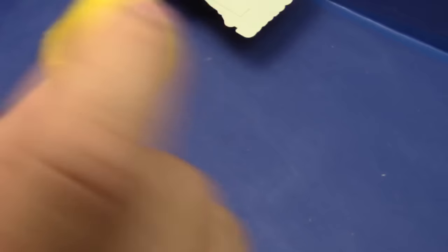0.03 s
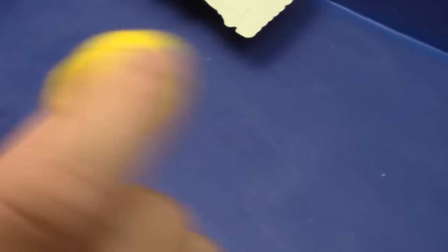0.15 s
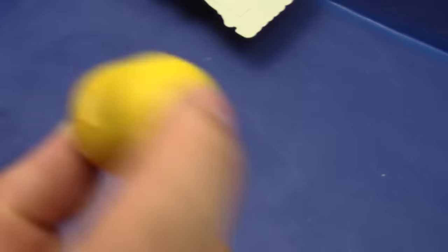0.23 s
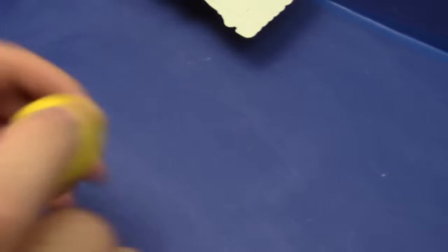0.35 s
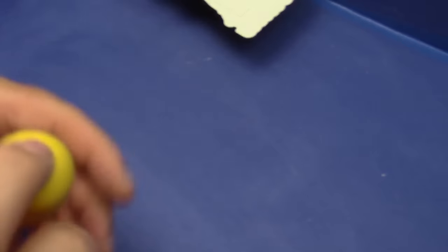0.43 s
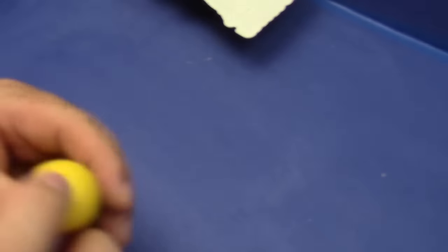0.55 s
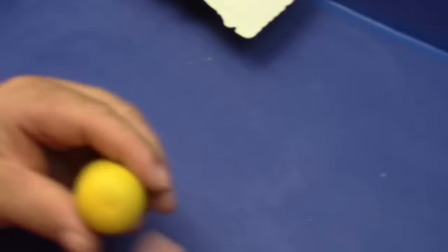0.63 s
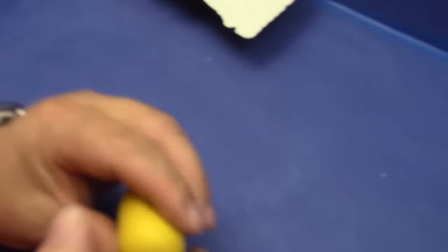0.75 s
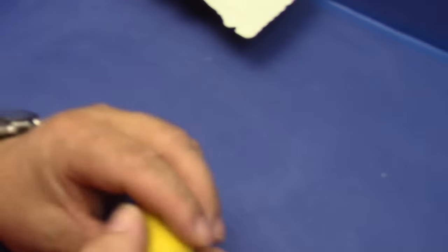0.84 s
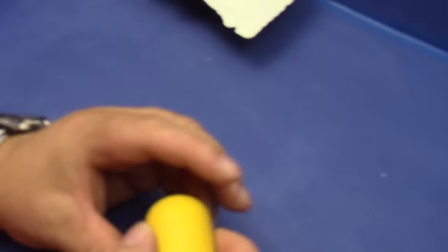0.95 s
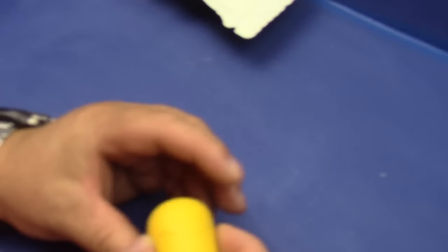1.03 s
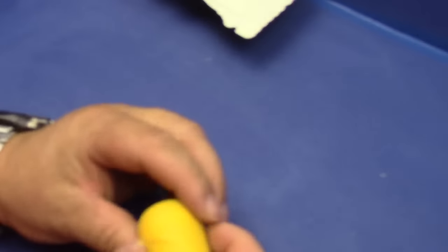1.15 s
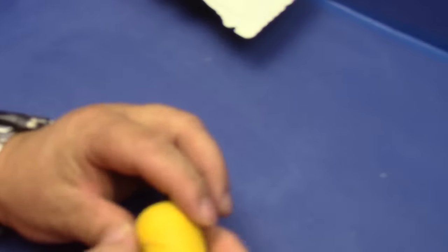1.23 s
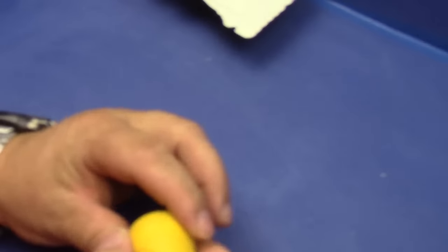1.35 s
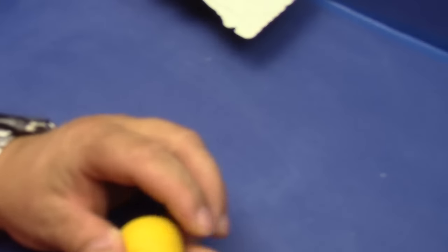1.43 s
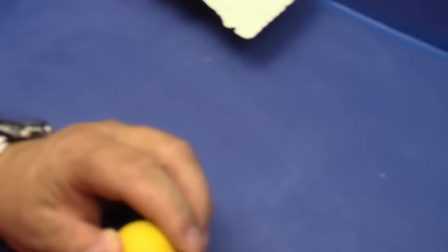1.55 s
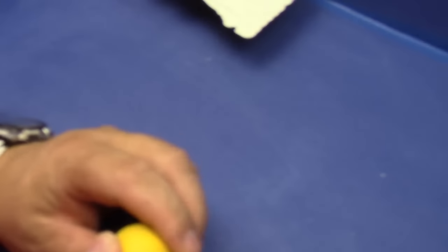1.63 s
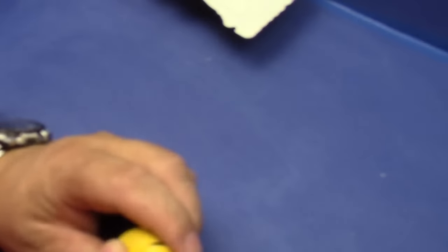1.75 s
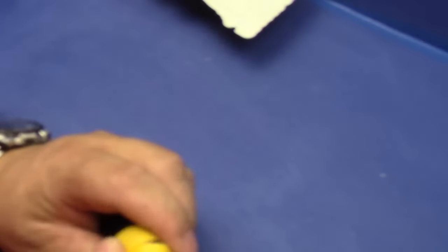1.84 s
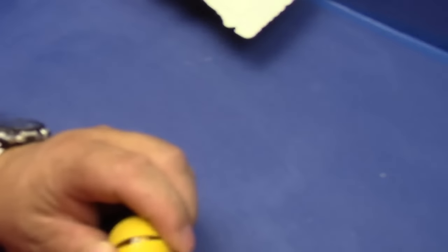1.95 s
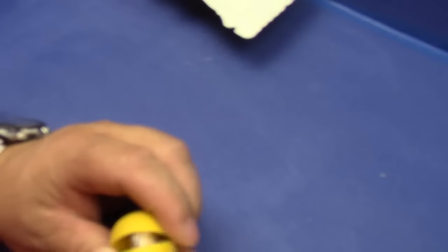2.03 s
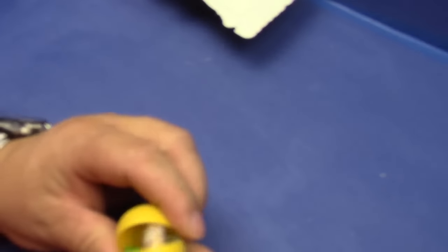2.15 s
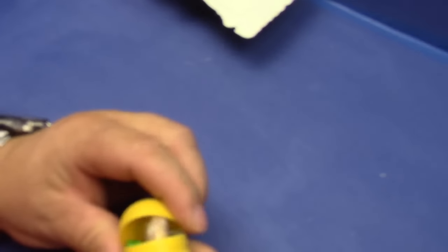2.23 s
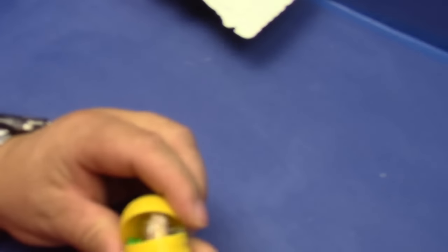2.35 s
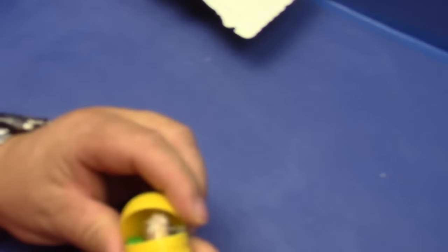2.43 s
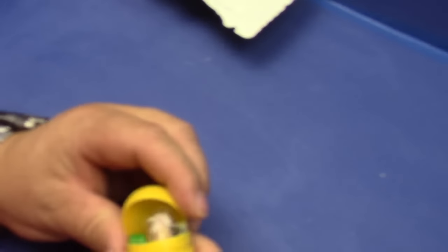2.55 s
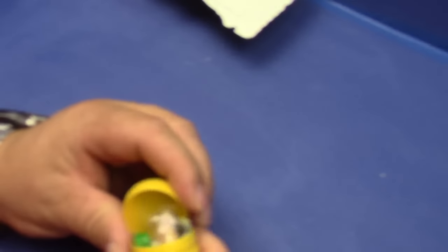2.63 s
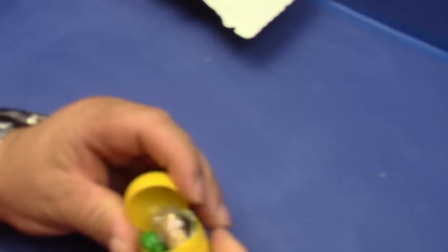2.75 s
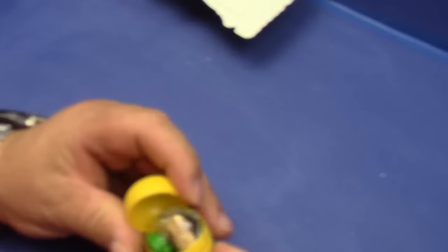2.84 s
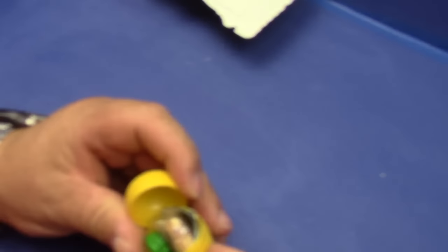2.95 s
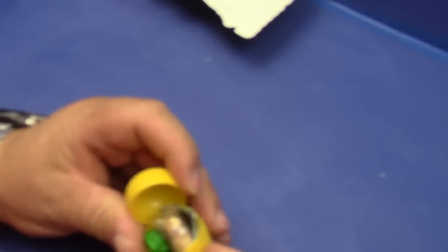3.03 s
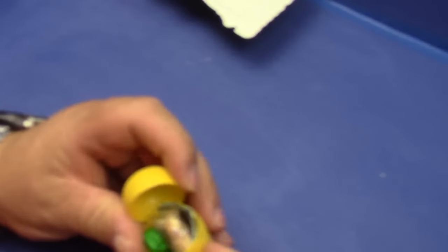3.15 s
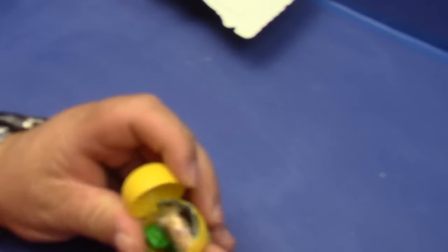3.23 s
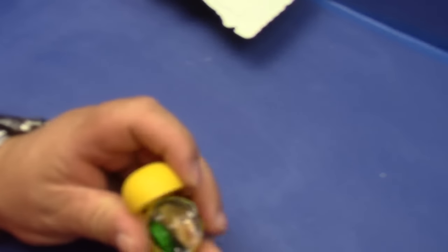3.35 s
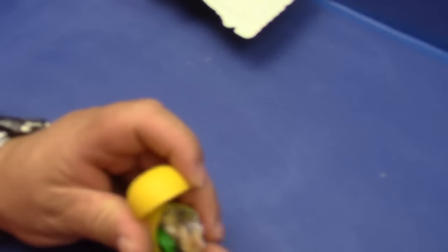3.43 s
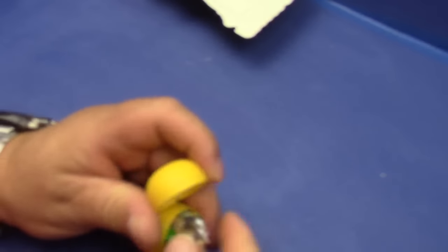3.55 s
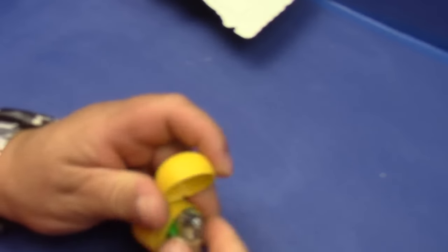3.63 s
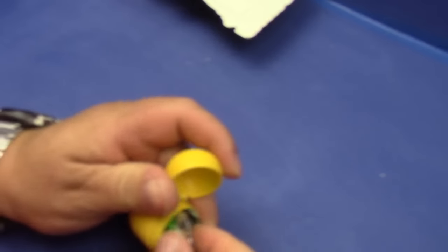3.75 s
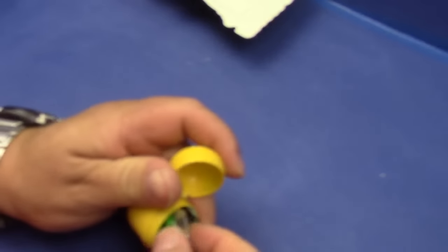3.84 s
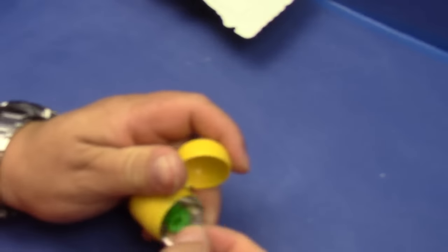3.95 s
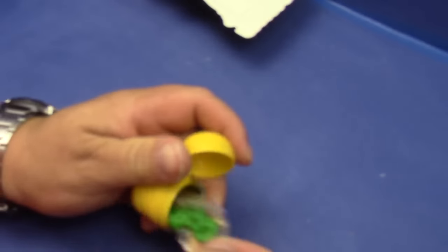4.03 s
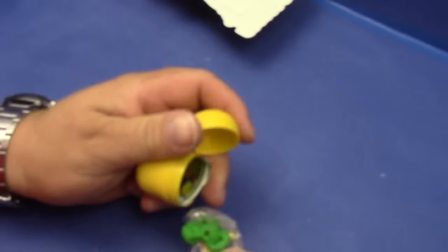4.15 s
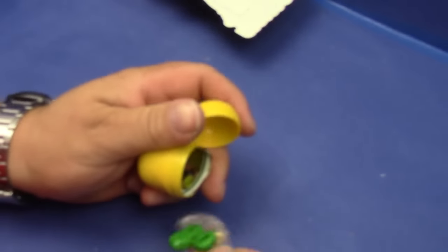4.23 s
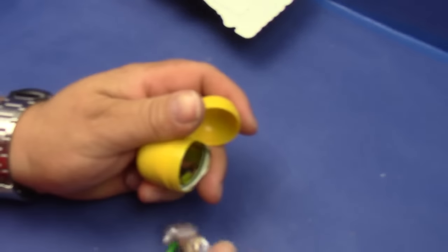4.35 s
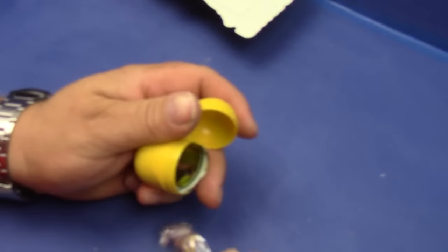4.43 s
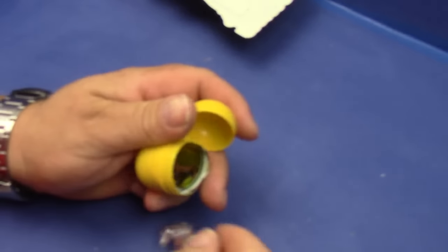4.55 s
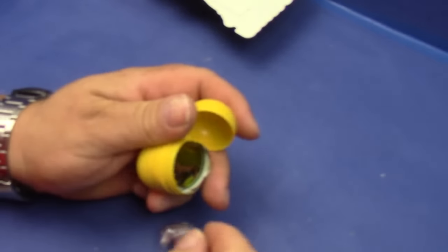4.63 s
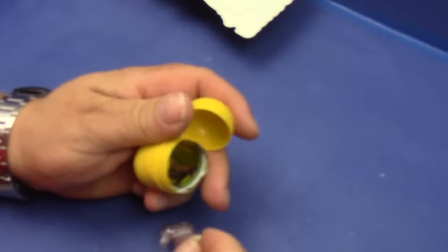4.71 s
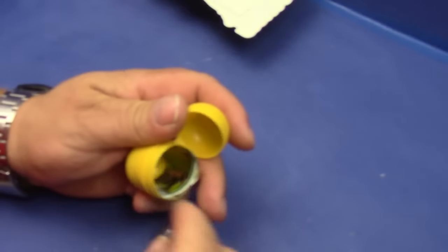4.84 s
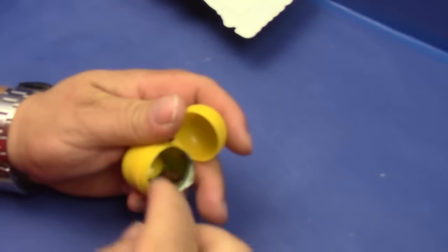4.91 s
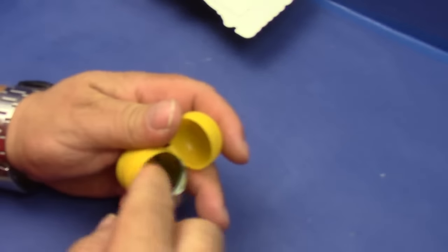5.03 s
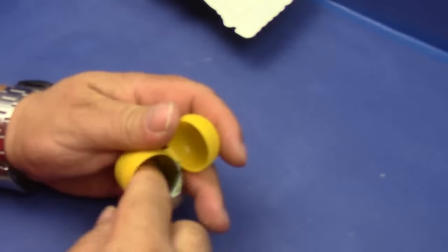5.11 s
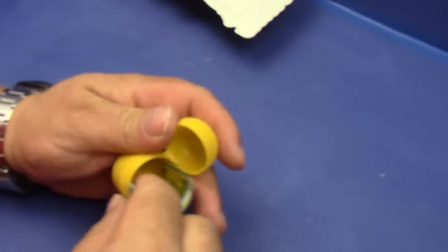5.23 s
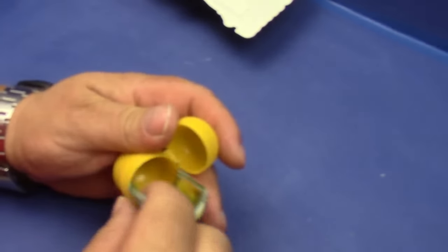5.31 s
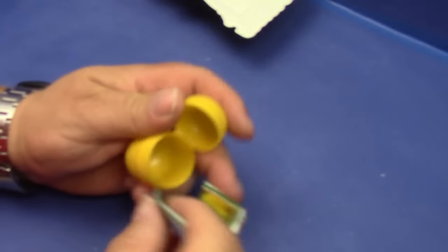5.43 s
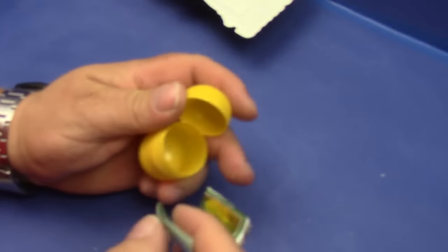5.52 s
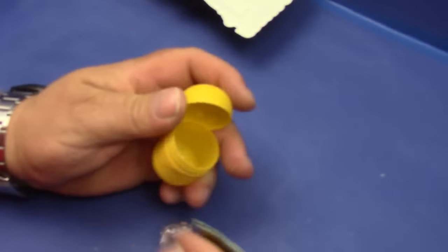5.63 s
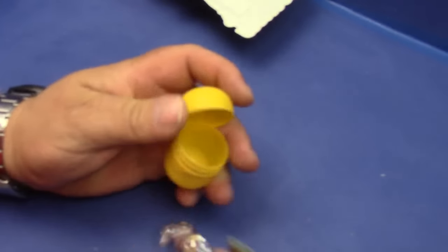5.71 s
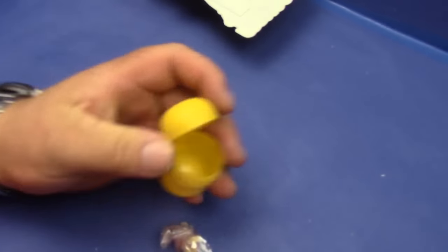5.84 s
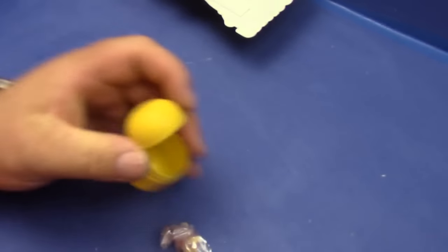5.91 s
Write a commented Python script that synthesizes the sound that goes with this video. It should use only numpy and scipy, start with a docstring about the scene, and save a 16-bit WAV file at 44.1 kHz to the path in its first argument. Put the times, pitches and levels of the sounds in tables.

```python
"""Hands squeeze a small plastic capsule open over a table, then pull out a crinkly bag and a rolled leaflet.
Shell and film crack: short noise snaps ring the film high up and the hollow cup lower down.
Dull knocks are soft taps that ring the struck part and shake the table top and the capsule's hollow.
Skin, film and paper rub, and parts rattle after the pop: hiss and tiny slips through film, cup and table.
A quiet room adds echoes made of fading noise, and a steady air noise lies below."""
import sys
import numpy as np
from scipy import signal
from scipy.fft import rfft, irfft
from scipy.io import wavfile

SR = 44100
rng = np.random.default_rng(int(sys.argv[2]) if len(sys.argv) > 2 else 0)


def wav_out(sig):
    """Save sig, one row per channel (or a flat mono array), as 16-bit PCM at SR to the path in sys.argv[1]."""
    wavfile.write(sys.argv[1], SR, np.round(np.clip(np.atleast_2d(sig).T, -1, 1) * 32767).astype(np.int16))


N = 263762   # length in samples


def amp(db):
    """Turn decibels into a gain."""
    return 10 ** (np.asarray(db) / 20)


def rms_one(x):
    """Scale a signal to an rms level of 1."""
    return x / np.sqrt(np.mean(x ** 2) + 1e-20)


def at_hz(points, hz):
    """Read a table between its points, along a log-frequency axis."""
    p = np.array(points)
    return np.interp(np.log(np.maximum(hz, 1)), np.log(p[:, 0]), p[:, 1])


def resonance(x, hz, width_hz):
    """Ring at one pitch: a two-pole band-pass with a gain of about 1 at its peak."""
    r = np.exp(-np.pi * width_hz / SR)
    top = [(1 - r * r) / 2, 0, (r * r - 1) / 2]
    bottom = [1, -2 * r * np.cos(2 * np.pi * hz / SR), r * r]
    return signal.lfilter(top, bottom, x)


def body(x, peaks):
    """Ring an object: several resonances side by side, with alternating signs."""
    return sum((-1) ** k * amp(db) * resonance(x, hz, width)
               for k, (hz, width, db) in enumerate(peaks))


def highpass(x, order, hz):
    """Remove what lies below a frequency."""
    return signal.sosfilt(signal.butter(order, hz, "high", fs=SR, output="sos"), x)


def band(x, low_hz, high_hz):
    """Keep what lies between two frequencies."""
    return signal.sosfilt(signal.butter(2, [low_hz, high_hz], "band", fs=SR, output="sos"), x)


def flicker(rate_hz):
    """Slow random wandering with an rms of 1."""
    r = np.exp(-2 * np.pi * rate_hz / SR)
    settle = 9000   # samples dropped while the filter settles
    wander = signal.lfilter([1], [1, -2 * r, r * r], rng.standard_normal(N + settle))
    return rms_one(wander[settle:])


def burst(noise, click, t60, tail_t60, tail_db):
    """One sharp click, a snap of noise that dies within milliseconds, and a weaker, longer chatter."""
    t = np.arange(len(noise)) / SR
    snap = amp(-60 * t / t60)
    chatter = amp(tail_db - 60 * t / tail_t60)
    return click * (t == 0) + noise * (snap + chatter)


def add(out, piece, s, peak_db):
    """Lay a piece in at a time, with a given peak."""
    i = round(s * SR)
    scaled = amp(peak_db) * piece / np.abs(piece).max()
    out[i:i + len(piece)] += scaled[:N - i]


# Cracks of shell and film; pitch is the fold's own: start_s, treble_peak_db, cup_peak_db, pitch_hz
CRACKS = [(0.7794, -21, -21, 2140), (1.4332, -27.5, -34, 8700), (1.5946, -39, -57, 5860),
          (1.6663, -43, -34.5, 2320), (1.7873, -24, -9, 2450), (1.7884, -3, 1, 2404),
          (1.8025, -8, -20.5, 10400), (1.8063, -17, -14, 6330), (1.8261, -22.5, -24, 6520),
          (1.831, -16.5, -28.5, 11130), (1.8443, -18.5, -28, 8400), (1.9077, -9, -26, 6300),
          (1.9281, -14, -6.5, 2690), (1.9364, -19, -17, 11000), (1.9518, -14, -19.5, 5260),
          (1.995, -15.5, -16, 6240), (2.0146, -16.5, -22, 5440), (2.1542, -29.5, -22.5, 2780),
          (2.219, -30.5, -31, 3030), (3.102, -5.5, -11, 2880), (3.2006, -18, -12.5, 3220),
          (3.3466, -33, -30, 1680), (3.3668, -26, -16.5, 2070), (3.4518, -43, -35, 2120),
          (3.7045, -35, -35.5, 2730), (3.7428, -14.5, -23.5, 10800), (3.7515, -14.5, -24, 9800),
          (3.9031, -7.5, -30, 8750), (3.9142, -8, -13.5, 9100), (3.9375, -0.5, -16.5, 9000),
          (3.9709, 0, -17.5, 9000), (4.0242, -12.5, -18, 8500), (4.0543, -12, -7, 9500),
          (4.0571, 1, -8, 1500), (4.0674, -2.5, -45, 5830), (4.0966, -25, -18.5, 1980),
          (4.1981, -21, -24, 7400), (4.216, -4.5, -8.5, 9000), (4.2566, -13, -20.5, 9500),
          (4.2912, -0.5, -16, 9900), (4.2999, -11, -13, 9050), (4.3326, -7, -9.5, 3420),
          (4.3412, -7, -9.5, 6260), (4.3705, -26, -16, 1700), (4.3764, -19, -26, 6200),
          (4.4636, -38, -11, 2620), (4.5223, -11, -12, 1490), (4.5677, -29.5, -22.5, 3520),
          (4.8295, -28.5, -48, 8600), (5.3803, -22, -36, 6400), (5.7339, -10, -22, 5700),
          (5.803, -47, -21, 1400)]
# Resonances of the thin film: pitch_hz, width_hz, level_db
FILM_RINGS = [(4780, 2000, 0), (5965, 510, 8), (8040, 3300, 2.5), (10830, 630, -6), (11270, 1400, -30.5),
              (14900, 3900, -8)]
CUP_BELOW_HZ = 4500   # a fold pitched lower than this is heard through the cup
USUAL_TREBLE_HZ, USUAL_CUP_HZ = 6480, 2610   # where the other part of a crack rings
CHATTER_T60_S, CHATTER_DB = 0.032, -8   # fade time of the chatter, and its start beside the snap


def cracks():
    """Each buckling fold rings the film high up and the air in the cup lower down."""
    out = np.zeros(N)
    folds = list(CRACKS) + crackle()
    noise = rng.standard_normal((len(folds), 2, 2600))
    for (start, treble_db, cup_db, hz), (film_noise, cup_noise) in zip(folds, noise):
        through_cup = hz < CUP_BELOW_HZ
        cup_hz = hz if through_cup else USUAL_CUP_HZ
        treble_hz = USUAL_TREBLE_HZ if through_cup else hz

        snap = burst(film_noise, 6, .004, CHATTER_T60_S, CHATTER_DB)
        treble = .45 * body(snap, FILM_RINGS) + resonance(snap, treble_hz, 1500)
        add(out, band(treble, 3500, 16500), start, treble_db)

        pop = burst(cup_noise, 5, .005, CHATTER_T60_S, CHATTER_DB + 2)
        hollow = 0.67 * band(pop, 1300, 5500) + resonance(pop, cup_hz, 600)
        add(out, band(hollow, 980, 5000), start, cup_db)
    return out


# Spells of small random crackle; the peak is the middle one: start_s, end_s, cracks_per_s, treble_peak_db
CRACKLE_SPELLS = [(1.897, 1.967, 60, -24), (3.975, 4.11, 30, -37), (4.221, 4.44, 30, -25)]
CRACKLE_SPREAD_DB = 4   # peaks vary this far up or down
CRACKLE_CUP_DB = 0   # usual cup peak minus treble peak


def crackle():
    """Small folds give way at random moments, strengths and pitches; rows have the columns of CRACKS."""
    rows = []
    draws = rng.random((len(CRACKLE_SPELLS), 30, 4))
    for (start, end, per_s, db), spell in zip(CRACKLE_SPELLS, draws):
        count = int(per_s * (end - start))
        for when, size, lean, pitch in spell[:count]:
            moment = start + when * (end - start)
            peak = db + CRACKLE_SPREAD_DB * (2 * size - 1)
            cup_peak = peak + CRACKLE_CUP_DB + 8 * (lean - .5)
            rows.append((moment, peak, cup_peak, 5500 * 2 ** pitch))
    return rows


# Dull knocks of fingers and parts; the last column is the usual push on the low modes beside the peak:
# time_s, peak_db, pitch_hz, push_share_db
KNOCKS = [(0.51, -50, 543, 7), (0.778, -31, 855, -24), (0.917, -30, 374, -31), (0.918, -20, 1050, -25),
          (0.957, -28, 1140, -19), (1.787, -11, 640, 3), (1.801, 1.5, 600, -25), (1.813, -12.5, 480, -11.5),
          (2.218, -27.5, 1360, -18), (3.766, -34.5, 507, -8), (3.807, -32, 476, -8),
          (4.054, -12.5, 1420, -33), (4.33, -13.5, 1030, -4.5), (4.368, -20, 980, -6.5),
          (4.406, -12, 716, -10), (4.462, -11, 620, -32), (4.463, 1.5, 1295, -27), (4.473, -4.5, 1240, -36),
          (4.498, -6.5, 1130, -24), (4.521, -5, 1390, -40), (4.522, -8.5, 722, -31),
          (4.564, -16, 765, -8.5), (5.351, -29, 1260, -24), (5.8, -34.5, 305, -11),
          (5.803, -29.5, 766, -16), (5.829, -28.5, 710, -22)]
# Ringing modes of the table top, and near 636 Hz the capsule's hollow; t60 is the time to fade by 60 dB:
# pitch_hz, level_db, t60_s
LOW_MODES = [(208, -8.5, 0.32), (276.3, -15.5, 0.34), (352.5, -16, 0.26), (503, -23.5, 0.11),
             (636, -14.5, 0.32), (738, -6.5, 0.047)]
TAP_DELAY_S = .0024   # from the listed time to the tap; the push comes after half of it


def knocks():
    """A soft tap rings the struck part for a few cycles and shakes the table top and the hollow."""
    out = np.zeros(N)
    push = np.full((len(LOW_MODES), N), 1e-18)
    noise = rng.standard_normal((len(KNOCKS), 4000))
    spread = rng.standard_normal((len(KNOCKS), len(LOW_MODES)))
    for (time, db, hz, push_db), tap_noise, chance in zip(KNOCKS, noise, spread):
        tap = burst(tap_noise, click=14, t60=0.0014, tail_t60=0.05, tail_db=-11)
        thud = band(band(tap, .4 * hz, 1.4 * hz), .4 * hz, 1.4 * hz)
        ring = resonance(resonance(tap, hz, .25 * hz), hz, .8 * hz)
        add(out, ring + .5 * thud, time + TAP_DELAY_S, db)
        # each mode gets a slightly different share of the push
        push[:, round((time + TAP_DELAY_S / 2) * SR)] += amp(db + push_db + 1.5 * chance)

    for (hz, db, t60), clicks in zip(LOW_MODES, push):
        r = amp(-60 / (t60 * SR))
        w = 2 * np.pi * hz / SR
        soft = signal.lfilter([.1], [1, -.9], clicks)   # a push, not a ping
        out += amp(db) * signal.lfilter([0, np.sin(w)], [1, -2 * r * np.cos(w), r * r], soft)
    return out


# Rubbing strokes of skin, film and paper, and the rattle of parts just after the pop at 1.79 s;
# change is over the whole row's length:
# start_s, length_s, film_start_db, change_db, cup_minus_film_db, table_minus_film_db
STROKES = [(0.514, 0.11, -45.5, -6, -7, -20), (0.902, 0.15, -52.5, -5, 5, 6.5),
           (1.099, 0.085, -61.5, -5, 6, 14.5), (1.202, 0.06, -48, -9, -9, -9),
           (1.241, 0.089, -55, 6.5, -12, -17), (1.391, 0.094, -55.5, -2, -5, -4.5),
           (1.794, 0.15, -36.5, -16, -7, 11), (2.588, 0.15, -57, -3, 0, -2), (2.719, 0.23, -57, 1, 2, 0),
           (3.263, 0.12, -59, 0.5, 7.5, -0.5), (3.469, 0.065, -48.5, -5, 2, -6),
           (3.545, 0.072, -50, -10.5, -7, -14), (3.627, 0.059, -47.5, -12.5, 2.5, -4),
           (3.953, 0.106, -43.5, 9.5, 1.5, -12), (4.058, 0.13, -39.5, -7, -0.5, -3.5),
           (4.194, 0.3, -42, -5.5, -4, -3.5), (5.039, 0.1275, -44.5, -4, 4.5, -3.5),
           (5.181, 0.208, -46.5, 3, 4.5, -11.5), (5.489, 0.1, -46.5, -16.5, -6.5, -16),
           (5.564, 0.036, -50.5, 14.5, -5.5, -11), (5.601, 0.045, -46, -6.5, -30, -24),
           (5.773, 0.095, -45.5, 0, 1, -10), (5.858, 0.073, -41, 3.5, -7.5, -10),
           (5.917, 0.08, -48.5, 5, -6, -17)]
# Faint handling between the strokes, gliding from row to row: time_s, film_db, cup_minus_film_db
HANDLING = [(0, -70.5, 6), (0.3, -58.5, -1), (0.9, -63.5, -0.5), (1.2, -66, 2.5), (1.4, -94, -5),
            (1.95, -61.5, 1), (2.05, -52.5, 5), (2.35, -81.5, 9.5), (3.05, -82.5, 11), (3.15, -55.5, -8),
            (3.45, -69, -5), (3.68, -68, 1), (3.75, -54.5, 6.5), (3.9, -61.5, 5.5), (4.5, -66, 21),
            (4.75, -60, 0.5), (5.04, -62.5, 0.5), (5.5, -57.5, -2.5), (5.98, -55, -9)]
# Resonances of the hollow cup: pitch_hz, width_hz, level_db
CUP_RINGS = [(1700, 800, 6.5), (2450, 960, 0.5), (3280, 1000, -12.5)]
# Dull handling also presses the table: table minus film = share of cup minus film + dB
TABLE_FOLLOWS_CUP, TABLE_RUB_DB = 1.03, -0.5


def rub_levels(edge_s):
    """Power in film, cup and table: faint handling plus the strokes and the rattle."""
    t = np.arange(N) / SR
    s, film_db, cup_db = np.transpose(HANDLING)
    film_db, cup_db = np.interp(t, s, film_db), np.interp(t, s, cup_db)
    table_db = TABLE_FOLLOWS_CUP * cup_db + TABLE_RUB_DB
    power = amp(film_db + [0 * t, cup_db, table_db]) ** 2
    for start, length, first_db, change_db, cup_db, table_db in STROKES:
        end, last_db = start + length, first_db + change_db
        i, j = np.clip([round(start * SR), round(end * SR)], 0, N)
        # light ones swell and fade gently
        rise_s, fall_s = np.clip(edge_s * amp(-48.5 - np.array([first_db, last_db])), .003, .05)
        rise, fall = (t[i:j] - start) / rise_s, (end - t[i:j]) / fall_s
        shape = np.clip(np.minimum(rise, fall), 0, 1)
        level_db = np.linspace(first_db, last_db, j - i) + [[0], [cup_db], [table_db]]
        power[:, i:j] += (shape * amp(level_db)) ** 2
    return power


def rubbing(grains_per_s, uneven_db, wander_db, edge_s):
    """Dense uneven slips on a hiss, heard through film, cup and table; one spell stands for a rattle."""
    sizes = amp(2.7 * np.minimum(rng.exponential(1, (2, N)), 5)) * rng.choice([-1, 1], (2, N))
    slips = rms_one(sizes * (rng.random((2, N)) < grains_per_s / SR))
    hiss = rng.standard_normal((2, N))
    drives = (.5 * slips + hiss) * amp(uneven_db * flicker(19.2))

    def wandering(peaks):
        """The grip keeps changing, so each resonance gains and loses strength on its own."""
        return sum(amp(db + wander_db * flicker(14)) * resonance(drives[k % 2], hz, width)
                   for k, (hz, width, db) in enumerate(peaks))

    film = band(wandering(FILM_RINGS), 3800, 15500)
    cup = band(wandering(CUP_RINGS), 1250, 3300)
    lowest_table_hz = LOW_MODES[0][0]
    table = band(drives[1], 260, 1500) + 3.4 * resonance(drives[0], lowest_table_hz, 4.8)
    gains = np.sqrt(rub_levels(edge_s))
    return sum(gain * rms_one(x) for x, gain in zip((film, cup, table), gains))


# Time the room's echoes take to fade by 60 dB: pitch_hz, t60_s
ROOM_FADE = [(200, 0.68), (800, 0.54), (2500, 0.34), (6000, 0.12), (14000, 0.26)]
ROOM_DB, ROOM_SIDE_DB = -12.5, -7.5   # echo gain, and extra gain of its side part
SIDE_FROM_HZ = 5500   # the echoes spread wide mostly above this


def room(dry):
    """Diffuse echoes: each half octave of noise dies at its own pace, and mostly the treble spreads wide."""
    t = np.arange(30000) / SR
    noise = rng.standard_normal((2, 2, len(t)))
    edges_hz = 100 * 2 ** np.arange(0, 7.5, .5)
    tail = sum(band(noise[k % 2], low, np.sqrt(2) * low) * amp(-60 * t / at_hz(ROOM_FADE, low))
               for k, low in enumerate(edges_hz))
    tail = tail * (1 - np.exp(-t / 0.00022))   # echoes thicken over the first moments
    tail = tail / np.sqrt(np.sum(tail[0] ** 2))
    mid, side = signal.fftconvolve(dry[None], tail, axes=1)[:, :N]
    side = .05 * side + band(side, SIDE_FROM_HZ, 16500)
    return amp(ROOM_DB) * mid, amp(ROOM_DB + ROOM_SIDE_DB) * side


# Tone colour of the air noise, only the shape matters: pitch_hz, level_db (per Hz)
AIR_COLOUR = [(26, -59.5), (45, -14.5), (208, -4.5), (317, -8), (386, -9.5), (448, -9), (665, -13),
              (771, -14.5), (872, -14), (1060, -16.5), (1580, -17), (9820, -30.5), (10800, -33.5),
              (15300, -45.5), (16500, -55.5)]
# Level of the side part of the air noise beside the mid: pitch_hz, side_minus_mid_db
AIR_WIDTH = [(60, -25), (110, -6), (200, -7), (380, -3.5), (700, -3.5), (1290, -6.5), (2380, -9),
             (4400, -8.5), (8120, -8), (15000, -14)]
AIR_DB = -57   # rms level of the mid part


def air():
    """Steady room noise and hiss: random noise shaped over frequency, as mid and side."""
    hz = np.fft.rfftfreq(N, 1 / SR)
    mid, side = rfft(rng.standard_normal((2, N))) * amp(at_hz(AIR_COLOUR, hz))
    mid = irfft(mid, N)
    side = irfft(side * amp(at_hz(AIR_WIDTH, hz)), N)
    gain = amp(AIR_DB) / np.std(mid)
    return gain * mid, gain * side


LOW_CUT_HZ = 175   # small things make no deep bass
NEAR_ECHO_DB, NEAR_ECHO_HZ, NEAR_ECHO_SAMPLES = -21.5, 900, 57   # gain, low edge, delay


def scene():
    """Everything sits near the middle; echoes and air spread out."""
    rubs = rubbing(grains_per_s=1800, uneven_db=1.8, wander_db=1.7, edge_s=0.0095)
    near = highpass(cracks() + knocks() + rubs, 4, LOW_CUT_HZ)
    wet, wet_side = room(near)
    hiss, hiss_side = air()
    mid = near + wet + hiss
    # a close echo, added on the left and subtracted on the right
    near_echo = band(np.roll(near, NEAR_ECHO_SAMPLES), NEAR_ECHO_HZ, 16500)
    side = wet_side + hiss_side + amp(NEAR_ECHO_DB) * near_echo
    return np.array([mid + side, mid - side])


def record(dry):
    """Peaks are rounded off towards 0.85 of full scale, then rumble and the very top are cut."""
    held = .85 * dry / (.85 ** 10 + np.abs(dry) ** 10) ** (1 / 10)
    held = highpass(held, 2, 55)
    top_cut = signal.cheby2(12, 70, 17000, fs=SR, output="sos")   # 70 dB down from 17 kHz up
    return signal.sosfilt(top_cut, held)


dry = scene()
out = record(dry)
wav_out(out)
```